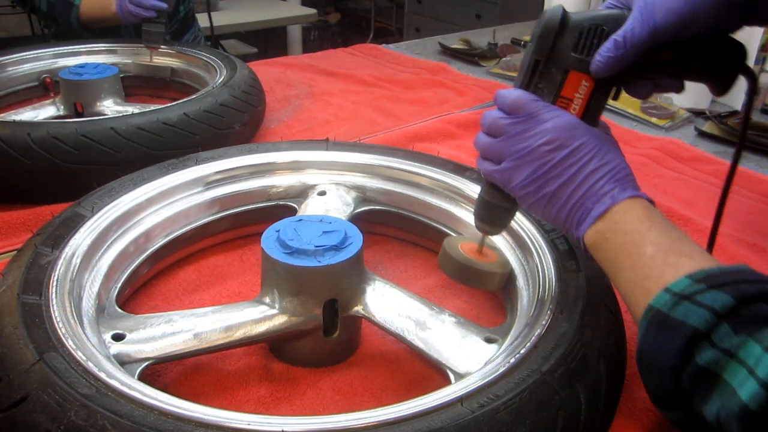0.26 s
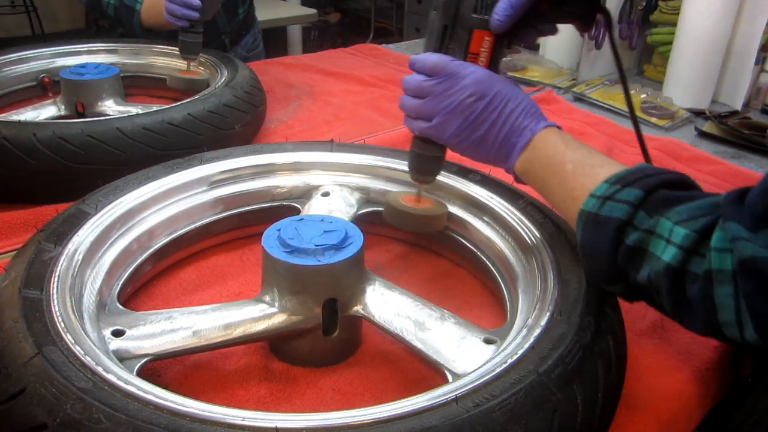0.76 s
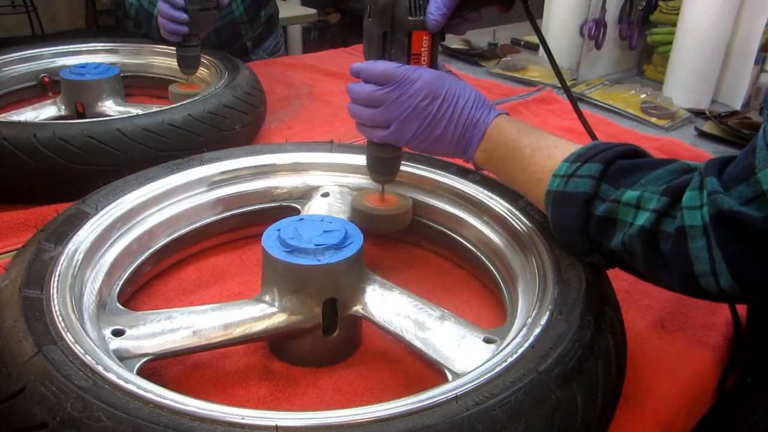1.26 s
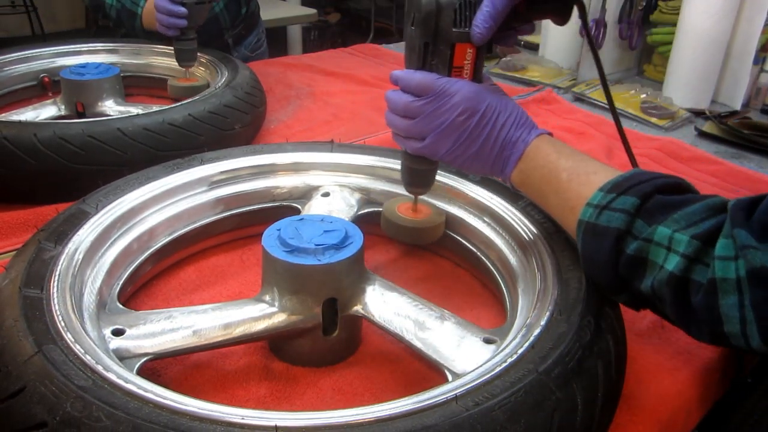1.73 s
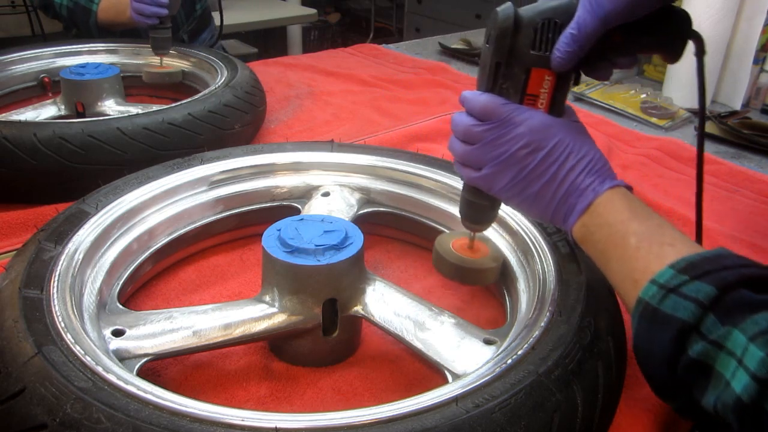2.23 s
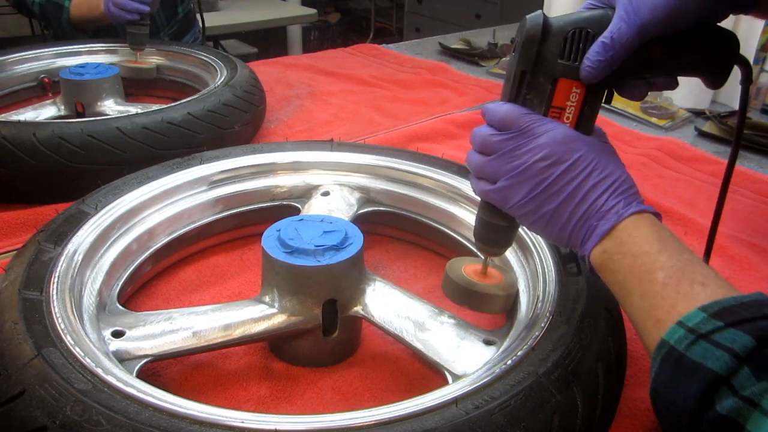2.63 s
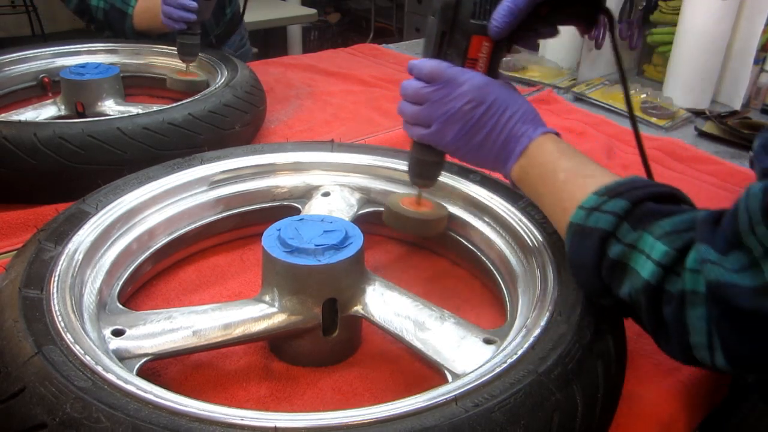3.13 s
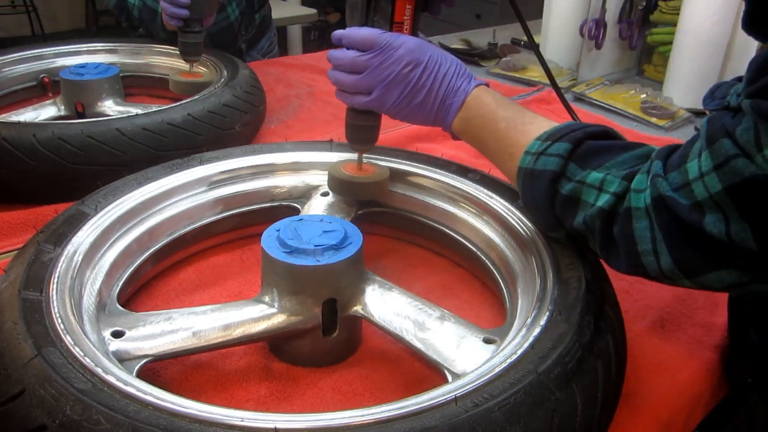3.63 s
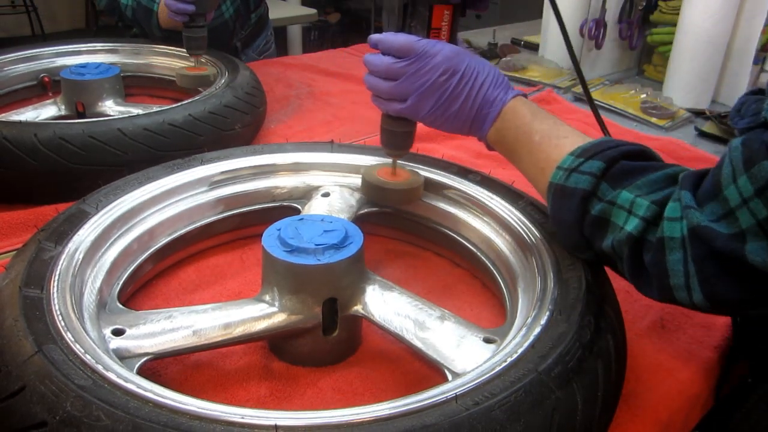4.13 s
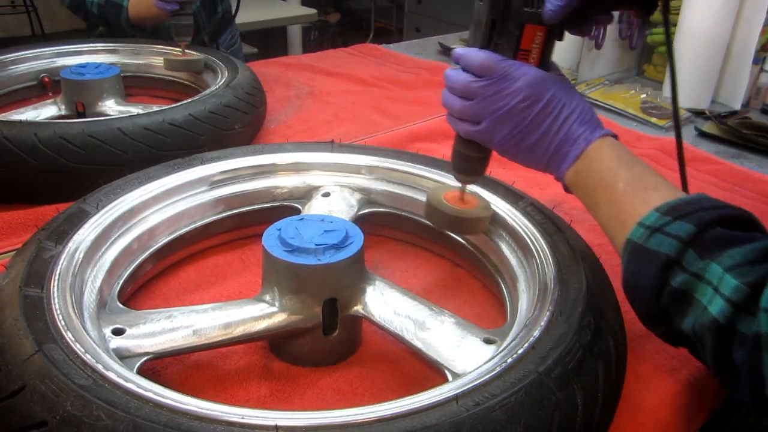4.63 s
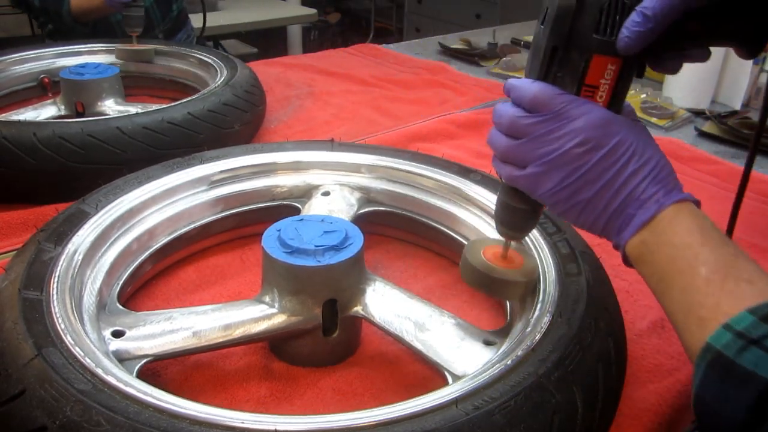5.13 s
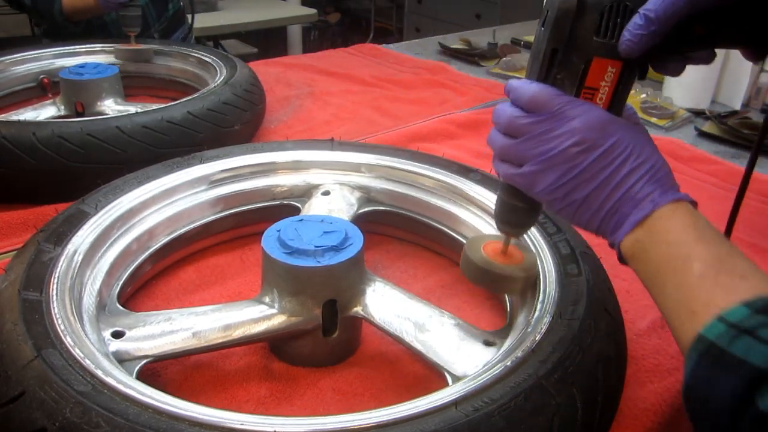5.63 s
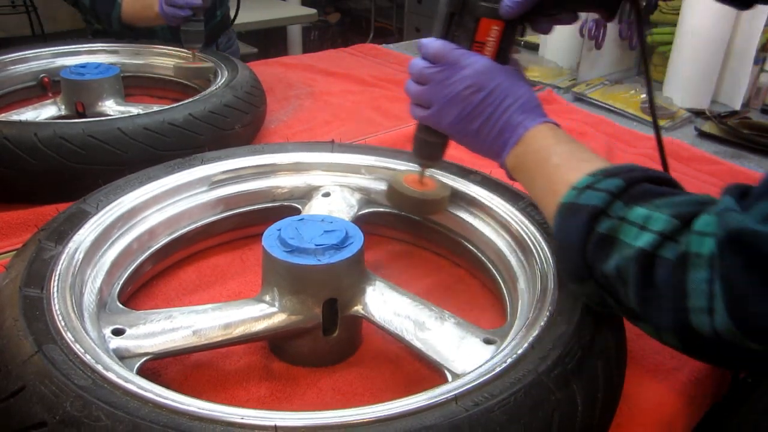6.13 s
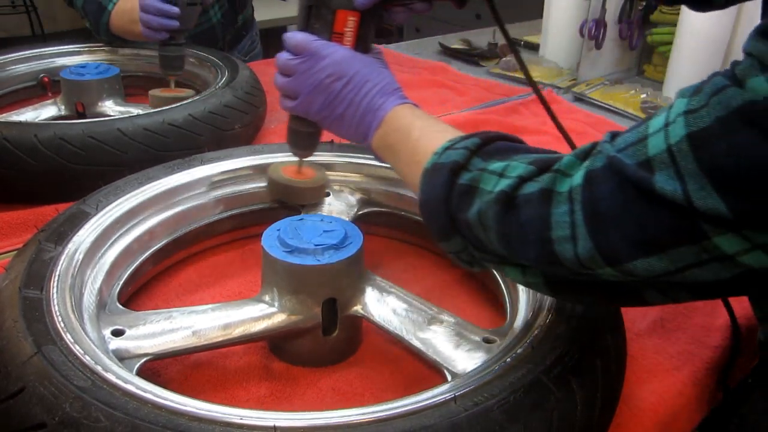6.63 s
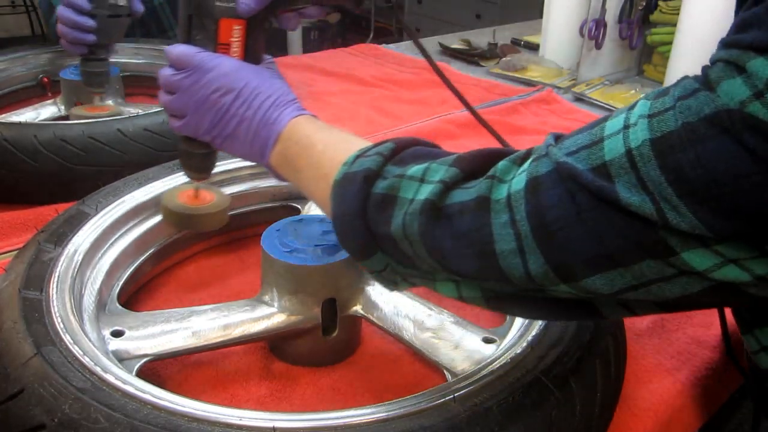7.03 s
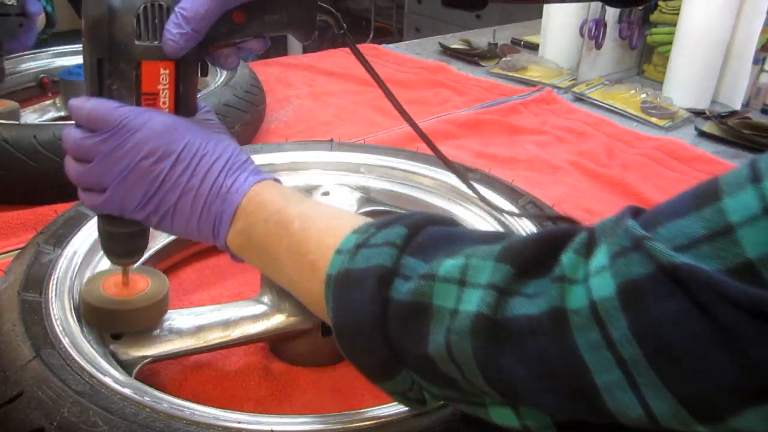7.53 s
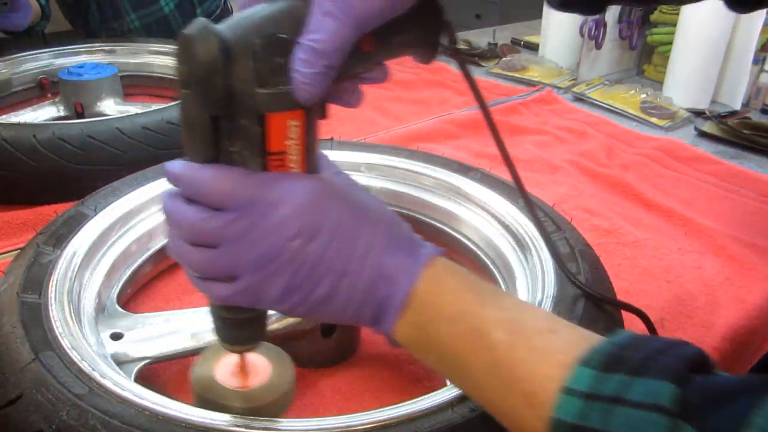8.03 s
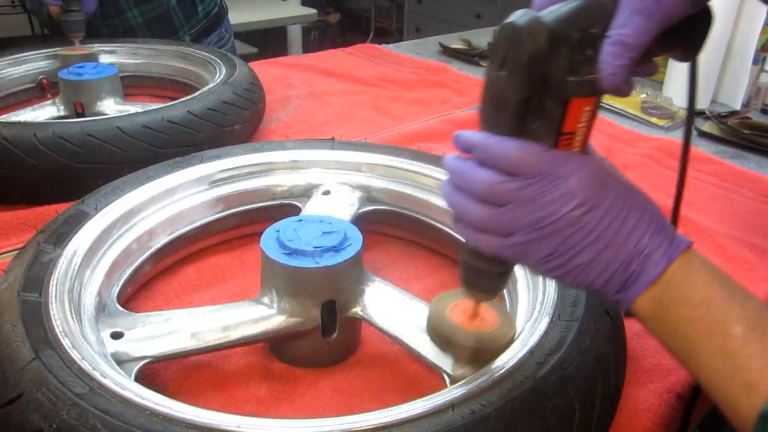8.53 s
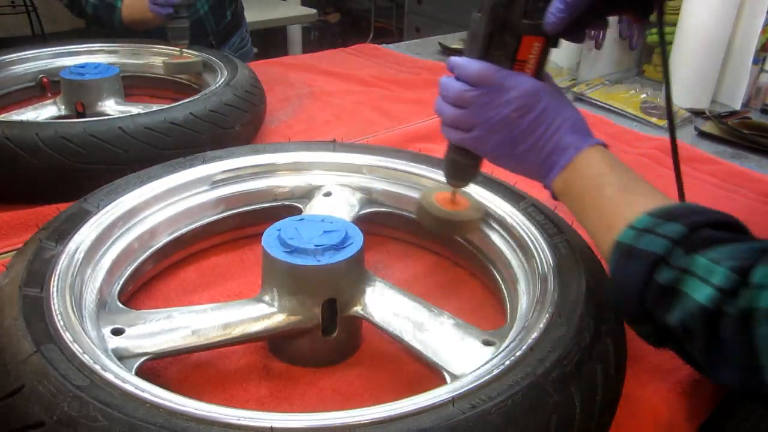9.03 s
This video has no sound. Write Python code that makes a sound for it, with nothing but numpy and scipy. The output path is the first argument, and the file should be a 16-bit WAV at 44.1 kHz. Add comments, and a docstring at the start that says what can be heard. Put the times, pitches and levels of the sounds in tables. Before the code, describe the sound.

Continuous power-tool noise, close and fairly dry with a short workshop reverberation, the same in both channels. A nasal motor whine wavers with load beneath broad fan noise, while abrasive flaps hiss and scrape on metal in a fast, rough flutter. Contact drops out briefly, a tiny squeal just before it, then returns. Toward the end the drill spins faster and looms closer before easing back. It never stops.

```python
"""Drill and flap wheel on a metal rim

A corded drill drives a flap wheel to and fro round the rim of an aluminium motorcycle wheel, in a workshop.
The motor whines as harmonics of its shaft; its fan rushes as filtered noise. The speed sags under load
and rises as the drill swings near. The flaps scrape as noise pulsed by the spindle and lift off briefly midway.
Their place on the rim moves the whine through standing waves; the hollow beside the rim rings in gliding bands."""
import sys
import numpy as np
from scipy import signal
from scipy.fft import rfft, irfft, next_fast_len
from scipy.io import wavfile
from scipy.ndimage import map_coordinates

SR = 44100
rng = np.random.default_rng(int(sys.argv[2]) if len(sys.argv) > 2 else 0)


def transcribe(u):
    """Save the signal u as a 16-bit wav file named by the first command-line argument.

    u: samples, shape (n,) or (channels, n), limited to [-1, 1]; the rate is SR.
    q: integer samples, one column per channel.
    """
    v = np.clip(np.atleast_2d(u).T, -1, 1)
    q = np.round(v * 32767).astype(np.int16)
    wavfile.write(sys.argv[1], SR, q)


N = 408366

# mean motor speed, before a slight random waver: (time [s], speed [turns/s])
MOTOR_SPEED = [(0.0, 505.2), (0.2, 504.0), (0.45, 488.7), (0.7, 482.6), (1.0, 489.6), (1.3, 513.8),
               (1.55, 506.2), (1.85, 488.8), (2.25, 479.2), (2.45, 484.6), (2.7, 498.7), (3.0, 490.2),
               (3.22, 488.2), (3.42, 513.9), (3.7, 470.5), (3.88, 439.4), (3.98, 441.2), (4.05, 458.7),
               (4.25, 479.1), (4.55, 485.3), (4.85, 485.1), (5.3, 499.3), (5.48, 508.1), (5.85, 497.7),
               (6.1, 501.6), (6.34, 510.4), (6.9, 545.4), (7.18, 556.7), (7.45, 557.0), (7.7, 562.6),
               (8.1, 549.1), (8.75, 524.5), (9.26, 516.3)]
# place of the flap wheel; 0 is right, 90 the far side, 270 the near side: (time [s], angle [degrees])
RIM_PLACE = [(0, -15), (.8, 50), (1.25, 68), (2.05, 31), (2.6, -0.5), (3.45, 77.5), (4.28, 71.5), (4.7, 24),
             (5.25, -14), (5.55, -7), (5.87, 30), (6.2, 58), (7, 125), (8, 244), (8.75, 371.5), (9.26, 415)]
# nearness of the drill to the microphone: (time [s], gain [dB])
NEARNESS = [(0, 0), (1.12, -2.5), (1.7, 0), (3.75, -2.5), (4.6, 2.5), (5.7, 0.5), (6.45, 2.5), (7.3, 6.5),
            (7.65, 8), (8, 7.5), (8.75, 2.5), (9.26, 3.5)]

# the whine and its standing waves: (shaft order, level [dB], share of the nearness gain,
# echo strength [0-1], angle of a node [degrees], node spacing [degrees])
WHINE_ORDERS = [(1, -42.07, 0.67, 0.23, 97.38, 220.0), (2, -42.14, 1.42, 0.48, 34.3, 66.86),
                (3, -46.01, 1.01, 0.49, -7.21, 101.62), (4, -51.59, 0.87, 0.47, 1.52, 106.42),
                (5, -47.9, 1.35, 0.34, 24.37, 195.38)]
# fainter motor lines: (shaft order, level [dB])
UPPER_ORDERS = [(6, -48), (7, -54), (8, -51), (9, -62), (10, -62), (11, -49), (12, -50.5), (13, -57)]
# one shaft order swells or fades: (middle [s], half length [s], shaft order, added level [dB])
ORDER_FLARES = [(0.1, 0.3, 3, 11.6), (0.13, 0.3, 1, 3.6), (0.25, 0.3, 4, 10.9), (0.82, 0.11, 3, 4.6),
                (1.25, 0.15, 3, -14.0), (1.3, 0.14, 4, 7.4), (1.39, 0.25, 1, 3.0), (1.52, 0.22, 6, 10),
                (1.7, 0.23, 5, 7.7), (2.05, 0.15, 2, -4), (3.38, 0.1, 12, 9), (3.53, 0.12, 5, 8.6),
                (3.55, 0.15, 2, 3), (3.9, 0.13, 1, -7), (4.03, 0.025, 1, -8), (4.28, 0.07, 1, -4.5),
                (4.41, 0.18, 5, -10.0), (4.39, 0.19, 3, 6.5), (4.57, 0.13, 2, -14.0), (5.18, 0.16, 3, 9.5),
                (5.4, 0.27, 2, -5.5), (5.41, 0.14, 4, 14.0), (5.5, 0.12, 3, -10), (5.53, 0.6, 1, 3.0),
                (5.99, 0.18, 4, -14.0), (6.3, 0.15, 6, 7), (6.43, 0.26, 4, 9.4), (6.77, 0.09, 2, 5.6),
                (6.98, 0.1, 4, -8), (7.13, 0.25, 5, 9.5), (7.15, 0.2, 2, 2), (7.1, 0.45, 6, 5),
                (7.4, 0.1, 5, -8), (7.53, 0.07, 4, 6), (7.9, 0.1, 3, 4), (7.93, 0.5, 4, 13.5),
                (8.11, 0.1, 2, -12.2), (8.55, 0.25, 1, -2.5), (9.18, 0.13, 4, 11.0)]
# gear hum: (spindle order, level against GEARS_DB [dB])
GEAR_ORDERS = [(3, -46.5), (4, -47.5), (7, -39.5), (8, -39.5)]
GEAR_RATIO = 11.75  # shaft turns per spindle turn
FAN_DB, GEARS_DB = -30, -33.5
GEAR_UNLOADING = 0.22  # share of the flaps' lift drop, in dB, that the gear hum also loses
WHINE_WAVER_DB = 0.63
# the higher orders flutter as the gears load and release the shaft: dB per order above the first
FLUTTER_DB = 0.24
# the housing radiates the lowest order poorly once the motor slows below this
HOUSING_HZ, HOUSING_DB_PER_HZ = 492, 0.06

# spectrum of the fan's air and brush noise: (frequency [Hz], level [dB])
AIR_SPECTRUM = [(25, -24), (110, -41), (200, -26), (350, -16.5), (520, -12.5), (680, -9), (900, 2),
                (1350, 5), (1900, 2.5), (3200, 1.5), (6200, 0), (7500, -4.5), (10500, -10.5), (15000, -23)]
# the vents roar while they face the microphone: band, level, then centre and half angle of their beam
VENT_HZ, VENT_WIDTH_HZ, VENT_DB, VENT_DEGREES, VENT_BEAM_DEGREES = 1227, 124, -33.5, 139, 46
# the fan's rush sounds hollow on the far side: band, share lost, then centre and half angle
SHADE_HZ, SHADE_WIDTH_HZ, SHADE_SHARE, SHADE_DEGREES, SHADE_SPAN_DEGREES = 1620, 240, 0.38, 94, 48
# echoes off rim and bench: (mean delay [s], swing [s], place of the longest path [degrees], strength)
DRILL_ECHOES = [(.0042, .0009, 75, .17)]
# the same columns, for the sanding
RIM_ECHOES = [(.00066, .00022, -106, -.07), (.0028, .0008, -160, .26)]

# how hard the flaps bear, before any lift: (time [s], scrape [dB], grit hiss [dB], ring of the rim [dB])
SANDING_LEVELS = [(0, -20.5, -26, -38), (.48, -23.5, -32, -21.5), (.72, -21, -23.5, -25),
                  (1.17, -25.5, -29, -39), (1.31, -24, -27.5, -34), (1.5, -25, -26.5, -48),
                  (2.14, -26.5, -30.5, -27), (2.37, -22.5, -26.5, -18), (2.6, -24.5, -31, -29.5),
                  (2.96, -24.5, -26, -18.5), (3.23, -24.5, -25.5, -29.5), (3.33, -35, -36, -34),
                  (3.74, -39, -45, -35), (3.86, -33, -33, -30.5), (4.24, -26, -27, -24),
                  (4.57, -26.5, -29, -28.5), (4.9, -23.5, -28, -28), (5.24, -23.5, -28, -27),
                  (5.45, -23, -27, -28), (5.7, -21.5, -29, -26), (5.88, -27.5, -29, -23),
                  (6.06, -32, -32, -29.5), (6.32, -29.5, -27.5, -25.5), (6.47, -36, -30.5, -29.5),
                  (6.8, -31.5, -36, -30), (7.11, -29.5, -36, -47), (7.3, -27, -25, -43),
                  (7.75, -25, -25, -28.5), (8.6, -30, -25.5, -23.5), (9.26, -26, -27, -30)]
# uneven flaps modulate the scrape: (spindle order, relative depth)
FLAP_ORDERS = [(1, 0.2), (3, 0.088), (4, 0.11), (7, .1), (8, 0.23), (10, 0.17), (11, 0.26), (12, 0.19),
               (13, 0.15), (16, 0.12), (17, 0.1)]
# the flaps drum on the rim: (spindle order, level against the scrape [dB])
DRUM_ORDERS = [(4, -50), (6, -45), (7, -49.5), (8, -45)]
# the flaps skip or lift off the metal: (start [s], end [s], drop [dB])
FLAP_LIFTS = [(0.14, 0.177, 8), (1.185, 1.266, 2.5), (3.346, 3.7, 24), (5.31, 5.397, 3), (6.828, 6.93, 6),
              (7.408, 7.535, 16)]
LIFT_EDGE_S = 0.067
# spectrum of the scrape: (frequency [Hz], level [dB])
SCRAPE_SPECTRUM = [(40, -38), (200, -33.5), (750, -20), (2300, -11.5), (3000, -4), (3900, -0.5),
                   (4500, -1.5), (5300, 0), (6500, -4), (7500, -14.5), (10000, -18.5), (15000, -34)]
# spectrum of the grit hiss: (frequency [Hz], level [dB])
GRIT_SPECTRUM = [(2000, -50), (5500, -6), (7300, 1), (8600, 1.5), (9700, 0), (11200, -0.5), (12200, -4.5),
                 (13400, -11), (15600, -15.5)]
# the rim's own broad modes: (frequency [Hz], half width [Hz], level against the ring [dB])
RIM_MODES = [(3853, 320, -12), (4580, 410, -13.5), (5445, 570, -5.5), (6160, 640, -3.5)]
# the hollow between flap wheel and rim sings: (start [s], end [s], start [Hz], end [Hz], level [dB])
HOLLOW_GLIDES = [(0.047, 0.6, 5910, 4950, -25.5), (0.803, 1.296, 5880, 6280, -33),
                 (0.698, 1.453, 3880, 3750, -35), (1.2, 1.75, 6300, 5850, -35),
                 (1.602, 2.154, 4770, 4400, -29.5), (1.5, 2.102, 5630, 5250, -35),
                 (1.98, 2.518, 6910, 6200, -30), (2.3, 3.047, 6020, 5400, -30.5),
                 (3.697, 4.048, 5800, 5500, -30.5), (4.142, 4.521, 6740, 6100, -28),
                 (4.252, 4.85, 5910, 5100, -28.5), (4.3, 4.95, 6600, 7200, -30),
                 (4.598, 5.148, 11200, 10700, -38), (4.748, 5.35, 6810, 5600, -27),
                 (5.377, 5.649, 5650, 5750, -28), (5.6, 5.918, 5570, 6900, -30),
                 (5.519, 5.845, 5120, 6000, -33), (6.059, 6.36, 5670, 6550, -37),
                 (7.818, 8.1, 5330, 5350, -30), (7.696, 8.45, 8750, 8450, -41),
                 (8.299, 9.152, 9600, 8900, -37), (8.552, 9.262, 6230, 5950, -36)]
GLIDE_WIDTH_HZ = 330
# the hollow cancels a moving band, or lifts it where depth is negative: (time [s], centre [Hz], depth [dB])
HOLLOW_NOTCH = [(0, 7200, -1), (1.7, 6500, 3.5), (2.1, 5800, 2.5), (2.9, 4700, -3.5), (3.8, 4550, 2),
                (4.35, 5400, 4), (4.8, 6000, -3), (5.05, 5400, 9), (5.4, 4450, 3), (5.85, 5350, 4),
                (6.15, 4300, 3), (9.26, 4200, 1.5)]
NOTCH_WIDTH_HZ = 320
# gain of the top treble of the sanding: (time [s], level [dB])
TOP_TREBLE = [(0.8, 0.5), (1.2, -4), (2.3, 2), (3.6, -0.5), (6, 0), (7.4, -3)]
TOP_TREBLE_HZ = 10200
# brief squeals of the rubbed rim: (start [s], length [s], start [Hz], end [Hz], level [dB])
RIM_SQUEALS = [(3.173, .17, 7470, 8850, -33), (8.425, 0.164, 908, 866, -34.5)]

# decay of the workshop's diffuse sound: (frequency [Hz], time to fall 60 dB [s])
WORKSHOP_DECAY = [(200, 0.29), (2000, 0.51), (12000, 0.042)]
# spectrum of the faint background noise: (frequency [Hz], level [dB])
ROOM_TONE_SPECTRUM = [(25, -3), (45, 1), (70, -5), (200, -12), (1000, 25), (15000, -18)]
TOP_HZ = 15700  # upper band limit


def amp(db):
    """Level law: 20 dB is a tenfold amplitude."""
    return 10 ** (np.asarray(db) / 20)


def unit(x):
    """Normalisation: equal mean power, at rms 1."""
    return x / np.sqrt(np.mean(x ** 2) + 1e-20)


def along(points, hz):
    """Interpolation of (Hz, value) points on a logarithmic frequency axis."""
    f, v = np.transpose(points)
    return np.interp(np.log(hz + 1), np.log(f + 1), v)


def curves(rows):
    """Linear interpolation in time: one value per sample for each column after the time."""
    s, *cols = np.transpose(rows)
    return [np.interp(np.arange(N) / SR, s, c) for c in cols]


def wobble(rate, size=6):
    """Band-limited random fluctuation: a smooth curve with this many knots a second."""
    fine = signal.resample_poly(rng.standard_normal(int(N * rate / SR) + 4), size, 1)
    return np.interp(np.arange(N) * rate * size / SR, np.arange(len(fine)), fine)


def filtered(x, response):
    """Linear filtering: the spectrum of x times a response of frequency."""
    m = next_fast_len(N + 8192)  # padding limits wrap-around
    return irfft(rfft(x, m) * response(np.fft.rfftfreq(m, 1 / SR)), m)[:N]


def coloured(x, spectrum):
    """Spectral shaping: x through a (Hz, dB) curve, at rms 1."""
    return unit(filtered(x, lambda hz: amp(along(spectrum, hz))))


def tone(turns):
    """Phase accumulation: a sine of rms 1 follows a count of turns, from a random start."""
    return np.sqrt(2) * np.sin(2 * np.pi * (turns + rng.random()))


def band(centre_hz, width_hz, noise):
    """Quadrature modulation: two slow noises form one band of rms 1 round a steady or moving centre."""
    pole = np.exp(-2 * np.pi * width_hz / SR)
    slow = signal.lfilter([1], [1, -2 * pole, pole ** 2], noise)
    angle = 2 * np.pi * np.cumsum(centre_hz * np.ones(noise.shape[1])) / SR
    return unit(slow[0] * np.cos(angle) + slow[1] * np.sin(angle))


def mirrored(x, echoes, place):
    """Comb interference: echo paths change as the hand moves round the rim, so the ripples glide."""
    n, out = np.arange(N), x
    for delay_s, swing_s, longest, strength in echoes:
        path_s = delay_s + swing_s * np.cos(np.radians(place - longest))
        out = out + strength * map_coordinates(x, [n - SR * path_s], order=3)
    return np.std(x) * unit(out)


def flare(order):
    """Amplitude modulation: decibels that one shaft order gains or loses as it swells and fades."""
    t = np.arange(N) / SR
    return sum(rise_db * np.exp(-((t - middle) / half_length) ** 2)
               for middle, half_length, flared, rise_db in ORDER_FLARES if flared == order)


def lifted():
    """Loss of contact: decibels the sanding loses while the flaps skip or leave the metal."""
    t = np.arange(N) / SR
    return sum(drop_db * np.clip(0.5 + np.minimum(t - start, end - t) / LIFT_EDGE_S, 0, 1)
               for start, end, drop_db in FLAP_LIFTS)


def motor(speed_hz, turns, place, near_db):
    """Harmonics of rotation: shaft orders pass through standing waves, while the gears hum below."""
    shaft = turns + 0.01 * wobble(45)
    whine = np.zeros(N)
    for order, db, share, echo, node, spacing in WHINE_ORDERS:
        # direct sound and echo cancel at a node, less fully when the drill is near
        echo_phase = 2 * np.pi * (place - node) / spacing
        standing = abs(1 - echo * amp(-near_db / 2) * np.exp(1j * echo_phase))
        sag_db = HOUSING_DB_PER_HZ * np.maximum(HOUSING_HZ - order * speed_hz, 0)
        waver_db = WHINE_WAVER_DB * wobble(9) + FLUTTER_DB * (order - 1) * wobble(40)
        level_db = db + share * near_db + flare(order) - sag_db + waver_db
        whine += standing * amp(level_db) * tone(order * shaft)
    upper = np.zeros(N)
    for order, db in UPPER_ORDERS:
        level_db = db + 0.68 * near_db + flare(order) + 2.1 * wobble(6.5)
        upper += amp(level_db) * tone(order * shaft)
    hum = sum(amp(db + 2.8 * wobble(4.4)) * tone(order * shaft / GEAR_RATIO) for order, db in GEAR_ORDERS)
    hum_gain = amp(GEARS_DB + near_db - GEAR_UNLOADING * lifted())
    return whine + upper + hum_gain * hum


def fan(turns, place, near_db):
    """Turbulence noise: air and brush noise pulses a little with each turn; the vents beam a low roar."""
    pulse = 1 + 0.21 * tone(turns)
    air = coloured(rng.standard_normal(N) * pulse, AIR_SPECTRUM)
    far_side = np.exp(-((place - SHADE_DEGREES) / SHADE_SPAN_DEGREES) ** 2)
    shaded = filtered(air, lambda hz: np.exp(-((hz - SHADE_HZ) / SHADE_WIDTH_HZ) ** 2))
    air = air - SHADE_SHARE * far_side * shaded
    facing = np.exp(-((place - VENT_DEGREES) / VENT_BEAM_DEGREES) ** 2)
    vents = amp(VENT_DB) * facing * band(VENT_HZ, VENT_WIDTH_HZ, rng.standard_normal((2, N)))
    return amp(FAN_DB + near_db) * mirrored(air, DRILL_ECHOES, place) + vents


def grains():
    """Granular friction: white noise whose level flickers quickly at random."""
    return rng.standard_normal(N) * amp(1.5 * wobble(4000))


def flap_wheel(turns):
    """Modulated friction: flaps slap the rim in bursts of grit, more unevenly under harder pressure."""
    scrape_db, hiss_db, ring_db = curves(SANDING_LEVELS) - lifted()
    spindle = turns / GEAR_RATIO
    pressure = np.clip((scrape_db + 38.5) / 14, 0, 1)
    # the pattern of slaps drifts as the wheel tilts
    contact = spindle + 0.008 * wobble(22) + 0.04 * wobble(3)
    pattern = sum(depth * amp(2 * wobble(2)) * tone(order * contact) for order, depth in FLAP_ORDERS)
    unevenness = 0.6 * pattern + 0.014 * wobble(500) + 0.042 * wobble(35)
    # the soft flaps cap each slap
    slaps = unit(1 + np.tanh(pressure * unevenness))
    scrape = coloured(slaps * grains(), SCRAPE_SPECTRUM)
    hiss = coloured(slaps ** 0.81 * grains(), GRIT_SPECTRUM)
    rim = sum(amp(db) * band(hz, width, rng.standard_normal((2, N))) for hz, width, db in RIM_MODES)
    drum = sum(amp(db + 1.8 * wobble(7)) * tone(order * spindle) for order, db in DRUM_ORDERS)
    rubbing = amp(scrape_db) * (scrape + drum) + amp(hiss_db) * hiss
    ringing = slaps * (amp(ring_db) * rim + hollow())
    unsteady_hand = amp(0.56 * wobble(14))
    return unsteady_hand * (rubbing + ringing)


def hollow():
    """Cavity resonance: the hollow changes size with the wheel's travel, so its narrow ring glides."""
    out = np.zeros(N + SR)
    for start, end, start_hz, end_hz, db in HOLLOW_GLIDES:
        u = np.linspace(0, 1, int(np.clip((end - start) * SR, 2, SR)))
        centre_hz = start_hz + (end_hz - start_hz) * u
        ring = band(centre_hz, GLIDE_WIDTH_HZ, rng.standard_normal((2, len(u))))
        swell = np.sqrt(abs(np.sin(np.pi * u)))
        out[round(start * SR):][:len(u)] += amp(db) * swell * ring
    return out[:N]


def swept(x):
    """Moving interference: the hollow's notch sweeps the sanding noise; the top treble swells and fades."""
    hz, t, z = signal.stft(x, SR, nperseg=512)
    at = np.minimum(np.round(t * SR).astype(int), N - 1)
    notch_hz, depth_db, top_db = [c[at] for c in curves(HOLLOW_NOTCH) + curves(TOP_TREBLE)]
    notch = np.exp(-((hz[:, None] - notch_hz) / NOTCH_WIDTH_HZ) ** 2)
    shelf = 1 - 1 / (1 + (hz[:, None] / TOP_TREBLE_HZ) ** 20)
    return signal.istft(z * amp(top_db * shelf - depth_db * notch), SR, nperseg=512)[1][:N]


def workshop(x):
    """Reverberation: a short diffuse tail dies faster in the high treble."""
    hz, t, z = signal.stft(rng.standard_normal(SR // 2), SR, nperseg=256)
    decay_db = -60 * t / along(WORKSHOP_DECAY, hz)[:, None]
    tail = signal.istft(z * amp(decay_db), SR, nperseg=256)[1]
    return signal.fftconvolve(x, tail / np.linalg.norm(tail))[:N]


def squeals():
    """Frictional vibration: a flap catches on the rim, which sings in a short, wavering glide."""
    t, out = np.arange(N) / SR, np.zeros(N)
    for start, length, start_hz, end_hz, db in RIM_SQUEALS:
        u = np.clip((t - start) / length, 0, 1)
        hz = (start_hz + (end_hz - start_hz) * u) * (1 + 0.0099 * wobble(550))
        out += amp(db) * np.sin(np.pi * u) * tone(np.cumsum(hz) / SR)
    return out


def scene():
    """Superposition: motor, fan and flap wheel share one shaft; both channels carry the same sound."""
    speed_hz = curves(MOTOR_SPEED)[0] * (1 + 0.00075 * wobble(14))
    turns = np.cumsum(speed_hz) / SR
    place, near_db = curves(RIM_PLACE)[0], curves(NEARNESS)[0]
    sanding = swept(mirrored(flap_wheel(turns), RIM_ECHOES, place))
    drill = motor(speed_hz, turns, place, near_db) + fan(turns, place, near_db) + sanding + squeals()
    reverberation = amp(-19) * workshop(drill)
    room_tone = amp(-79 + 2.5 * wobble(4)) * coloured(rng.standard_normal(N), ROOM_TONE_SPECTRUM)
    mono = drill + reverberation + room_tone
    return np.array([mono, mono])


def record(dry):
    """Band limitation: nothing at or above the upper limit passes."""
    return np.array([filtered(channel, lambda hz: hz < TOP_HZ) for channel in dry])


dry = scene()
out = record(dry)
transcribe(out)
```